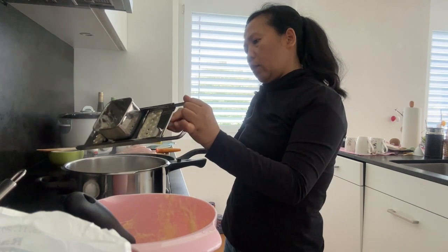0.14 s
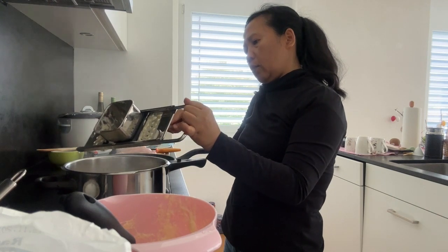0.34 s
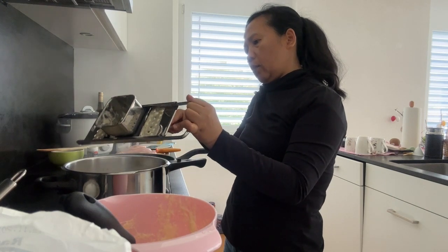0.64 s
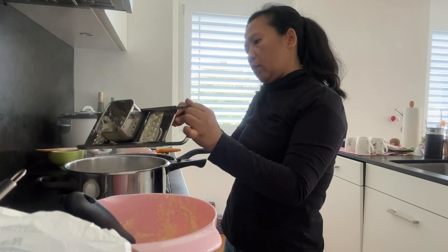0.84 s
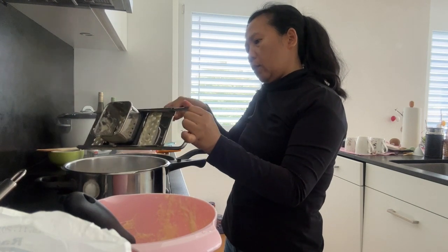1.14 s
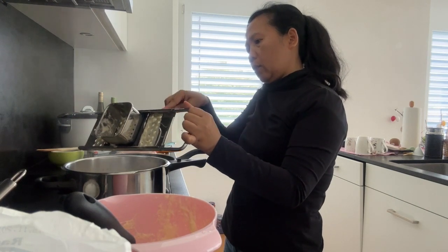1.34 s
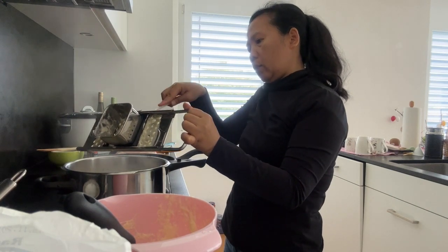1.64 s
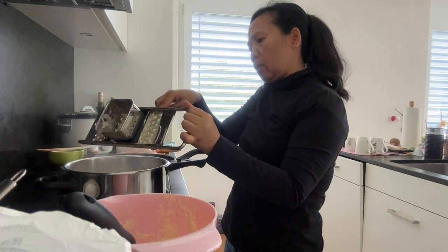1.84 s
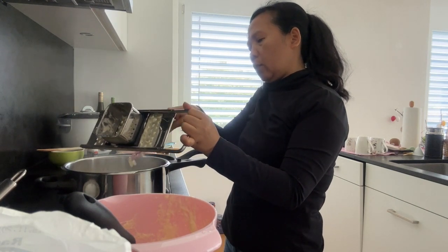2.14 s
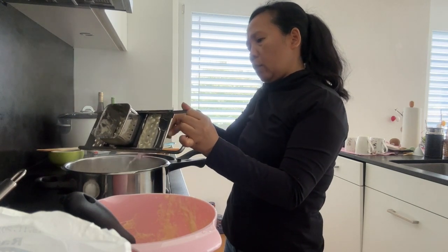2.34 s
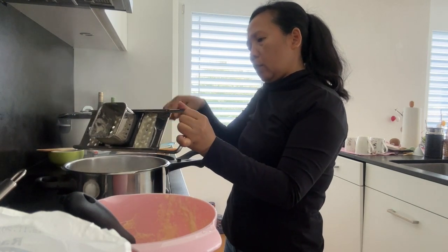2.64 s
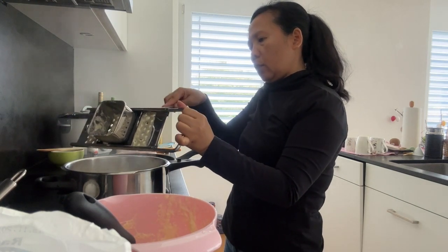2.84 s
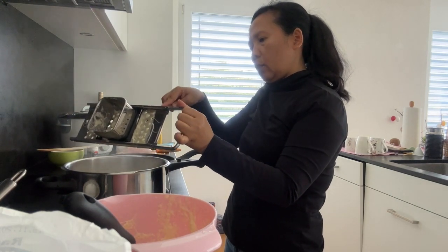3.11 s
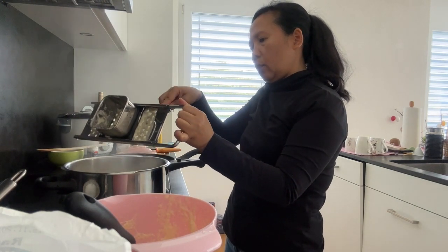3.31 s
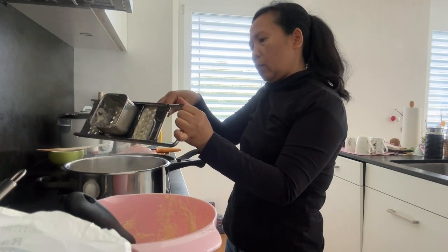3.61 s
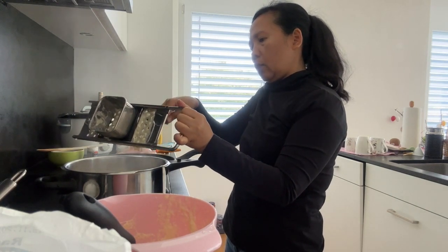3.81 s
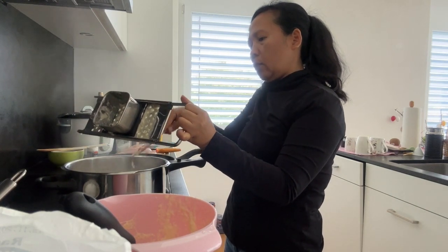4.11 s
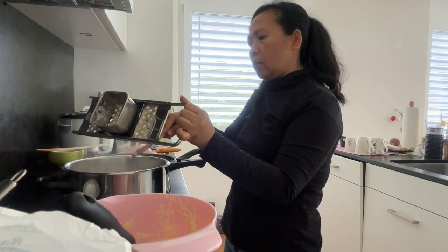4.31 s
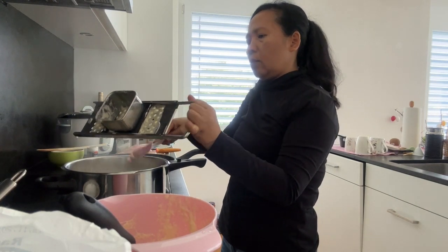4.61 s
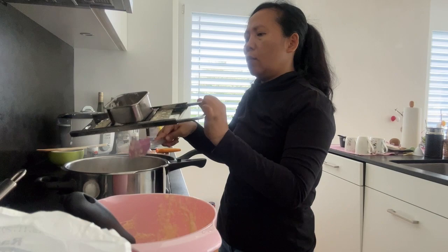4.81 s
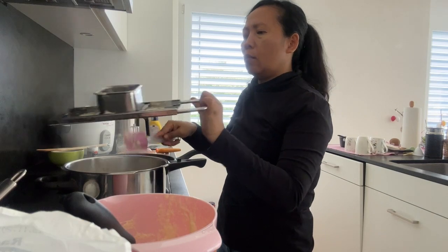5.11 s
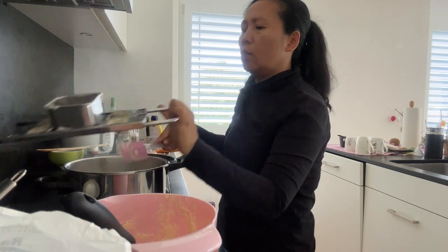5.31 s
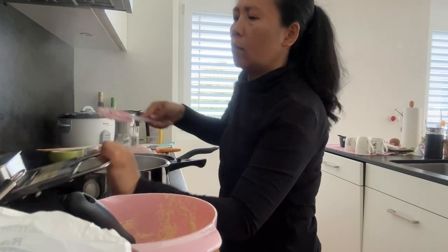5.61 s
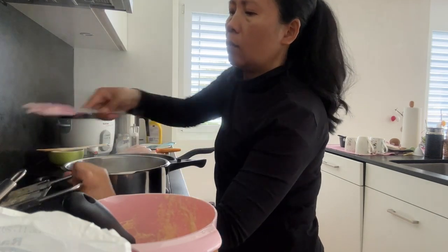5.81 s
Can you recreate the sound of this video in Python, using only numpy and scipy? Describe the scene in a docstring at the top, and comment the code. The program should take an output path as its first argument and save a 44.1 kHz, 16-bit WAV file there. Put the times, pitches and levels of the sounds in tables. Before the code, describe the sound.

Continuous extractor fan noise dominates: deep throbbing hum, faint wavering motor tones and hollow, duct-coloured air, slightly left in places. Above it a fine high simmering hiss flickers and spits occasionally. Nearly six seconds in, a loose metal kitchen tool lands close by with a tight burst of bright clanks and quickly damped ringing. The microphone's automatic gain pulls the background down under the clatter.

```python
"""Range hood, simmering pot and steel slicer

A twin-fan hood hums in a small kitchen: beating blade tones, magnetic hum and shaft tones are sines,
and the rush of air is noise coloured by duct resonances. The pot's hiss is flickering noise with spits.
At the end a steel slicer is put down on the counter: repeated blows excite decaying modes, dense noise
and short contact tones, with a room tail. A gain control then ducks everything under the clatter."""
import sys
import numpy as np
from scipy import signal
from scipy.fft import rfft, irfft
from scipy.io import wavfile
from scipy.ndimage import uniform_filter1d

SR = 44100
rng = np.random.default_rng(int(sys.argv[2]) if len(sys.argv) > 2 else 0)


def dump(signal):
    """Clip the signal to [-1, 1] and save it as 16-bit WAV at the path in sys.argv[1]."""
    limited = np.clip(np.atleast_2d(signal).T, -1, 1)
    pcm = np.round(limited * 32767).astype(np.int16)
    wavfile.write(sys.argv[1], SR, pcm)


N = 262395

# Weaker tones at multiples of the shaft speed: multiple, mean level/dB, wavering/dB
SHAFT_TONES = [(3.906, -54, -1), (4.98, -50.5, -0.5), (23.9, -56, -2.5)]
# Relative spectrum of the rush of air: f/Hz, level/dB per Hz
AIR_SPECTRUM = [(20, -45), (45, -13), (65, -13.5), (80, -1.5), (115, 2), (160, -1.5), (205, -7.5),
                (275, -20), (330, -13), (440, -15), (630, -13.5), (970, -12), (1200, -15.5), (1650, -18.5),
                (3500, -25), (7000, -29.5), (10000, -83)]
# Resonances of hood and duct: f/Hz, width/Hz, level/dB
DUCT_RESONANCES = [(178, 40, 1.5), (226, 13, -2.5), (300, 26.6, 4), (354, 61, 5), (538, 9.3, 5),
                   (793.8, 64, 8), (1082.7, 29, 6.5), (1346, 68, 4), (3220, 1000, 3), (4764, 400, 2.5)]
# Left-right likeness of the air noise: f/Hz, likeness (0-1)
AIR_LIKENESS = [(40, 0.955), (200, 0.947), (270, 0.15), (350, 0.32), (500, 0.47), (700, 0.68), (900, 0.995),
                (1000, 0.6), (1300, 0.31), (1600, 0.546), (1900, 0.037), (7000, 0.095)]
# Left-right level difference of the hood: f/Hz, left minus right/dB
AIR_BALANCE = [(30, -1.5), (45, 0.5), (70, 2.5), (90, 3.5), (200, 0.5), (350, -2.5), (800, 5.5),
               (1100, 3.5), (1350, 0), (1700, -0.5), (2000, -0.1), (7000, -2)]
# Relative spectrum of the pot's hiss: f/Hz, level/dB per Hz
HISS_SPECTRUM = [(2000, -12), (4000, -9), (6000, -3.5), (7800, -3.5), (9400, 1), (10500, -2.5), (13000, -3),
                 (14300, -2.5), (15800, -7.5)]
# Left-right likeness of the hiss: f/Hz, likeness (0-1)
HISS_LIKENESS = [(3000, 0.4), (6000, 0.17), (8000, 0.866), (9500, 0.9), (11500, 1), (14000, 1), (15000, 1),
                 (15800, 0.23)]
# Slow swell of the hiss: t/s, relative level/dB
HISS_SWELLS = [(0, 0.16), (.9, 1.4), (2.1, .5), (3.1, -0.71), (3.95, -0.5), (4.9, 0.2), (5.72, 0.13)]
# Drops that spit from the pot: t/s, initial level over the hiss/dB
SPIT_EVENTS = [(0.8674, 6), (1.7296, 4), (2.8864, -2), (3.7025, 6.5), (4.8194, 2.5), (5.1228, 8.5),
               (5.2994, 3)]
# Blows, first the frame landing, then the hopper rattling:
# t/s, strength/dB, share on the hopper (0-1), brightness/dB per octave, knock level/dB, knock f/Hz
BLOW_EVENTS = [(5.7459, -4.5, 0, 2.5, -21, 1000), (5.762, -14, 0.6, -6.5, -17, 640),
               (5.7785, -15, .45, -8, -7, 1180), (5.7836, -4, 0.8, -2, 6, 1250),
               (5.7866, -7, 0.85, 0, -14, 630), (5.800, -2.5, 0.84, 2.5, -3, 3720),
               (5.8114, -6, 0.8, 3, -4.5, 614), (5.8167, -10, 0.5, -3.5, -6, 1100),
               (5.835, -6.5, 0.86, 3.5, -11.5, 3450), (5.850, -17, 0.65, 0, -12, 1280),
               (5.858, -15, 0.77, -5.5, -20, 656), (5.896, -19, 0.8, -1, -26, 3000),
               (5.925, -28.5, 0.58, 2.5, -28, 873)]
# Relative spectrum of steel overtones too close to tell apart: f/Hz, level/dB per Hz
CLANK_SPECTRUM = [(150, -18), (250, -3), (450, 2), (634, 6), (784, 2.5), (1230, 8), (1900, 0), (2670, -0.5),
                  (3600, 0), (4660, -13), (5600, -5), (6300, -20), (7800, -36), (13200, -60)]
# Decay of these overtones: f/Hz, time to fall 60 dB/s
CLANK_DECAY = [(300, 0.19), (1000, 0.21), (4000, 0.11), (12000, 0.06)]
# Left-right level difference of the steel: f/Hz, left minus right/dB
STEEL_BALANCE = [(100, 5), (400, -3), (620, 7), (1026, -5.5), (1250, -1), (1785, 9.5), (2300, 0), (3000, 4),
                 (3725, 1), (5600, 1), (7100, -2.5), (8900, -0.5)]
# Left-right phase difference of the steel: f/Hz, lead of the left port/rad
STEEL_PHASE = [(100, 0.31), (400, 0.76), (620, 1.4), (1026, 1.7), (1250, 0.98), (1785, 2.3), (2300, 2.58),
               (3015, 4.335), (3725, 3.9), (4060, 5.5), (5600, 4.6), (7100, 4.3), (8860, 5.9), (10100, 6.7),
               (13600, 9.1), (15500, 9.7)]
# Decay of the room: f/Hz, time to fall 60 dB/s
ROOM_DECAY = [(150, .08), (500, .35), (1000, .45), (4000, .4), (12000, .2)]
# Modes of the slicer: f/Hz, relative level/dB, time to fall 60 dB/s, share of the loose hopper (0-1)
STEEL_MODES = [(394, -18.5, 0.27, 0.3), (606, -8, 0.16, 0.44), (655, -9, 0.27, 0.65), (897, -13, 0.52, 0.6),
               (1026, -6, 0.34, 0.54), (1091, -10, 0.25, 0.6), (1160, -12, 0.2, 0.4), (1205, -8, 0.3, 0.6),
               (1269, -7, 0.33, 0.37), (1502, -7.5, 0.25, 0.5), (1774, -4.5, 0.085, 0.82),
               (1880, -4, 0.067, 0.7), (1955, -8, .15, 0.6), (2140, -16, .2, .7), (2298, 4.5, 0.11, 0.78),
               (2378, -10, .15, 1), (2994, -13.5, 0.32, 1), (3013, -10.5, 0.35, 0.9), (3439, -14, 0.3, 1),
               (3474, -12, .3, 0.95), (3560, -16, .12, 1), (3661, 0, 0.18, 1), (3734, -6, 0.26, 0.89),
               (4028, -16, 0.18, 0.95), (4026, -12.5, 0.22, 0.78), (4930, -25, 0.4, 0.34),
               (5560, -20.5, 0.25, 0.97), (5614, -18.5, 0.21, 0.83), (7070, -12.5, 0.12, 0.06),
               (8864, -23.5, 0.34, 0.6), (9060, -30, .3, .6), (10086, -28.5, 0.2, 0.54),
               (12700, -24, .12, 0), (13601, -39, 0.11, 0.9)]

# Hood: one blade tone per fan wheel, six pulses a turn; levels are rms before the port difference
BLADE_HZ, IN_STEP_S = (85.87, 86.25), 0.35
BLADE_DB, OCTAVE_DB = -42.5, -50.5  # for each wheel
HUM_HZ, HUM_DB = 99.97, -38.0  # magnetic hum at twice the mains frequency
AIR_DB, AIR_LAG_S = -35.5, 0.0002  # the hood is on the left, so the right port lags

# Pot hiss: the right port is a delayed, partly alike copy, which makes it sound wide
HISS_DB, HISS_LAG_S = -42, 1.05e-4
SPIT_MS = 6.9  # power falls to 1/e in this time

# Slicer
CRACK_S, CRACK_DB, CRACK_MS, CRACK_HZ = 5.7455, -20, 8, 7000  # first contact of steel on stone
THUD_S, THUD_HZ, THUD_DB, THUD_LENGTH_S = 5.7468, 175, -6, 0.02
SNAP_DB, SNAP_MS, SNAP_HZ = -11, 1.6, 2600  # tick of hopper contacts, relative to the blow
RING_DB = -4
CLANK_DB, CLANK_GROWTH = -6, 0.41  # the clank grows by 0.41 dB per dB of blow strength
CLANK_GRAIN_DB = 2.5  # rms roughness as the loose parts chatter
FRAME_DULL_DB = -2.5  # frame clank, about this much per octave above 1 kHz
KNOCK_CYCLES = 28  # a contact tone falls 60 dB in this many cycles
COUNTER_HZ, COUNTER_DB, COUNTER_T60_S = 150.7, -8, 0.16
CONTACT_DB = -1.8  # each new contact damps what already rings
SETTLE_S, SETTLE_LENGTH_S, SETTLE_DB = 5.868, 0.008, -11  # full damping from 4 kHz up

RUMBLE_CUT_HZ, EDGE_HZ = 33, 15760


def gain_of(db):
    """Logarithmic level: 20 dB is a factor of ten in amplitude."""
    return 10 ** (np.asarray(db) / 20)


def evened(x):
    """Normalization to unit root mean square."""
    return x / np.sqrt(np.mean(x ** 2) + 1e-20)


def read(points, hz):
    """Linear interpolation on a logarithmic frequency axis."""
    f, value = np.transpose(points)
    return np.interp(np.log(hz + 1), np.log(f + 1), value)


def drift(t, slow_hz, fast_hz):
    """Random fluctuation as a superposition of slow sines with random phases."""
    total = 0
    for f in np.geomspace(slow_hz, fast_hz, 24):
        total = total + np.sin(2 * np.pi * (f * t + rng.random())) / np.sqrt(f)
    return evened(total)


def patches(hz, t, bins, steps):
    """Random field correlated over neighbouring frequencies and times by moving averages."""
    field = rng.standard_normal((len(t), len(hz))).T
    across_hz = uniform_filter1d(field, bins, axis=0)
    return evened(uniform_filter1d(across_hz, steps, axis=1))


def stereo_noise(size, field_db, likeness, lead, balance_db):
    """Partial coherence: two ports share part of a random short-time spectrum shaped by field_db(hz, t)."""
    frames, hz = 4 * N // size + 5, np.fft.rfftfreq(size, 1 / SR)
    a, b, c, d = rng.standard_normal((frames, len(hz), 4)).T
    same = np.clip(likeness(hz), 0, 1)[:, None]
    left = a + 1j * b
    right = same * left + np.sqrt(1 - same ** 2) * (c + 1j * d)
    right = right * np.exp(-1j * lead(hz))[:, None]
    half = gain_of(balance_db(hz) / 2)[:, None]
    spectra = np.array([left * half, right / half])
    spectra *= gain_of(field_db(hz, np.arange(frames) * size / 4 / SR))
    waves = signal.istft(spectra, nperseg=size, noverlap=3 * size // 4)[1]
    return evened(waves[:, :N])


def ports(x, balance, lead):
    """Stereo differences: one source reaches two ports with unlike level and phase (rad)."""
    padded = N + 4096  # keeps shifted sound from wrapping round
    hz = np.fft.rfftfreq(padded, 1 / SR)
    half = gain_of(read(balance, hz) / 2) * np.exp(0.5j * lead(hz))
    return irfft(rfft(x, padded) * np.array([half, 1 / half]), padded)[:, :N]


def air_lead(hz):
    """A constant delay gives a phase lead proportional to frequency."""
    return 2 * np.pi * hz * AIR_LAG_S


def fan_tones():
    """Beating: nearly equal blade tones and their octaves interfere, beside hum and wavering shaft tones."""
    t = np.arange(N) / SR
    tones = gain_of(HUM_DB) * np.cos(2 * np.pi * HUM_HZ * t)
    for hz in BLADE_HZ:
        phase = 2 * np.pi * hz * (t - IN_STEP_S)
        tones += gain_of(BLADE_DB) * np.cos(phase)
        tones += gain_of(OCTAVE_DB) * np.cos(2 * phase)
    shaft_hz = BLADE_HZ[1] / 6
    for multiple, db, waver_db in SHAFT_TONES:
        waver = np.interp(t, t[::400], drift(t[::400], 0.35, 2.52))
        sine = np.sin(2 * np.pi * (multiple * shaft_hz * t + rng.random()))
        tones += gain_of(db + waver_db * waver) * sine
    return ports(np.sqrt(2) * tones, AIR_BALANCE, air_lead)  # root two turns rms into peak


def air():
    """Turbulence filtered by resonance: broadband noise is coloured by the peaks and dip of the duct."""
    def field_db(hz, t):
        duct_db = sum(db / (1 + (2 * (hz - f) / width) ** 2) for f, width, db in DUCT_RESONANCES)
        steady_db = (read(AIR_SPECTRUM, hz) + duct_db)[:, None]
        return steady_db + 0.95 * patches(hz, t, bins=24, steps=10) + 0.5 * drift(t, 0.2, 10.0)

    rush = stereo_noise(2048, field_db, lambda hz: read(AIR_LIKENESS, hz),
                        air_lead, lambda hz: read(AIR_BALANCE, hz))
    return gain_of(AIR_DB) * rush


def pot():
    """Random bursting: bubbles make noise flicker over wide bands, and spitting drops add decaying power."""
    def field_db(hz, t):
        swell_t, swell_db = np.transpose(HISS_SWELLS)
        level_db = read(HISS_SPECTRUM, hz)[:, None] + np.interp(t, swell_t, swell_db)
        spit_power = 0
        for at, over_db in SPIT_EVENTS:
            decay = np.exp(-np.maximum(t - at, 0) * 1000 / SPIT_MS)
            spit_power = spit_power + gain_of(over_db) ** 2 * decay * (t > at - 0.0015)
        flicker = np.minimum(rng.exponential(1, len(t)), 5) - 1
        level_db = level_db + 10 * np.log10(1 + spit_power) + 1.35 * uniform_filter1d(flicker, size=3)
        return level_db + 0.705 * patches(hz, t, bins=10, steps=40) + 0.5 * drift(t, 2.5, 30.0)

    hiss = stereo_noise(256, field_db, lambda hz: read(HISS_LIKENESS, hz),
                        lambda hz: 2 * np.pi * hz * HISS_LAG_S, lambda hz: 0 * hz)
    return gain_of(HISS_DB) * hiss


def tick(t, db, decay_ms, corner_hz):
    """Impulsive contact: exponentially decaying noise, band-shaped around corner_hz; db drives the filter."""
    pole = np.exp(-2 * np.pi * corner_hz / SR)
    burst = signal.lfilter([1, -1], np.poly([pole, pole]), rng.standard_normal(len(t)))
    return gain_of(db) * burst * np.exp(-t * 1000 / decay_ms)


def thud(t):
    """Forced response: the counter top gives one short swell under a half-sine envelope."""
    swell = np.sin(np.pi * np.minimum(t / THUD_LENGTH_S, 1))
    return gain_of(THUD_DB) * swell * np.sin(2 * np.pi * THUD_HZ * t)


def ring(s, on_hopper, tilt_db, t):
    """Modal superposition: a blow at s feeds dying sines by place and brightness; later contacts damp them."""
    hz, db, t60, hopper = np.transpose(STEEL_MODES)[:, :, None]
    fed = (1 - hopper) * (1 - on_hopper) + hopper * on_hopper
    spot_db = 1.5 * rng.standard_normal(hz.shape)  # each blow lands on another spot
    slip = 0.8 * rng.standard_normal(hz.shape)  # rad out of step with earlier ringing
    level_db = db + spot_db + tilt_db * np.log2(hz / 2000) - 60 * t / t60
    if s < SETTLE_S:  # coming to rest damps the high ring
        settled = np.clip((t + s - SETTLE_S) / SETTLE_LENGTH_S, 0, 1)
        level_db += np.minimum(hz / 4000, 1) * SETTLE_DB * settled
    for later in BLOW_EVENTS:
        if later[0] > s + 0.006:
            level_db += CONTACT_DB * np.clip((t + s - later[0]) / 0.002, 0, 1)
    # Phase follows scene time, so later blows add nearly in step
    return (fed * gain_of(level_db) * np.sin(2 * np.pi * hz * (t + s) + slip)).sum(0)


def clank(t, on_hopper):
    """High modal density: overlapping overtones act as noise whose bands decay at their own rates."""
    hz, frames, z = signal.stft(rng.standard_normal(len(t)), SR, nperseg=128)
    dull_db = FRAME_DULL_DB * (1 - on_hopper) * np.log2(1 + hz / 1000)
    start_db = (read(CLANK_SPECTRUM, hz) + dull_db)[:, None]
    fall_db = 60 * frames / read(CLANK_DECAY, hz)[:, None]
    wave = signal.istft(z * gain_of(start_db - fall_db), SR, nperseg=128)[1]
    grain = evened(uniform_filter1d(rng.standard_normal(len(t)), size=60))
    return wave[:len(t)] * gain_of(CLANK_GRAIN_DB * grain)


def slicer():
    """Impact excitation: a crack and thud, then blows that knock, ring and clank; hopper blows also tick."""
    t, out = np.arange(SR // 4) / SR, np.zeros(N + SR)

    def add(s, sound):
        out[round(s * SR):][:len(t)] += sound

    add(CRACK_S, tick(t, CRACK_DB, CRACK_MS, CRACK_HZ))
    add(THUD_S, thud(t))
    counter = gain_of(COUNTER_DB - 60 * t / COUNTER_T60_S) * np.sin(2 * np.pi * COUNTER_HZ * t)
    build_up = 1 - np.exp(-t / 0.0005)  # the contact builds up
    for s, db, on_hopper, tilt_db, knock_db, knock_hz in BLOW_EVENTS:
        knock_level_db = knock_db - 60 * t * knock_hz / KNOCK_CYCLES
        blow = gain_of(knock_level_db) * np.sin(2 * np.pi * knock_hz * t)
        blow += gain_of(RING_DB + db) * ring(round(s * SR) / SR, on_hopper, tilt_db, t)
        blow += gain_of(CLANK_DB + CLANK_GROWTH * db) * clank(t, on_hopper)
        snap = tick(t, db + SNAP_DB, SNAP_MS, SNAP_HZ)
        blow += on_hopper * (gain_of(db) * counter + snap)
        add(s, blow * build_up)
    return out[:N]


def kitchen(x):
    """Reverberation: the last second is convolved with sparse random-sign taps, decaying band by band."""
    taps = np.zeros((2, SR // 2))
    at = np.arange(100, SR // 2 - 20, 20)
    at = at + rng.integers(0, 20, (2, len(at)))
    np.put_along_axis(taps, at, rng.choice([-1.0, 1.0], at.shape), 1)
    hz, t, z = signal.stft(taps, SR, nperseg=256)
    tail = signal.istft(z * gain_of(-60 * t / read(ROOM_DECAY, hz)[:, None]), SR, nperseg=256)[1]
    tail = tail / np.linalg.norm(tail[0])
    return signal.fftconvolve(x[None, -SR:], tail, axes=1)[:, :SR]


def scene():
    """Linear superposition of hood, pot, slicer and the room's answer to the slicer."""
    out = fan_tones() + air() + pot()
    steel = slicer()
    out += ports(steel, STEEL_BALANCE, lambda hz: read(STEEL_PHASE, hz))
    out[:, -SR:] += gain_of(-8.0) * kitchen(steel)
    return out


def record(dry):
    """Dynamic compression: a peak-holding level detector ducks the whole sound between two band limits."""
    rumble_cut = signal.butter(4, RUMBLE_CUT_HZ, "high", fs=SR, output="sos")
    dry = signal.sosfilt(rumble_cut, dry)
    power = uniform_filter1d((dry ** 2).mean(0), 300)
    power_db = 10 * np.log10(abs(power) + 1e-12)
    fall_db = np.arange(N) * 9.9 / SR  # the detector recovers 9.9 dB a second
    held_db = np.maximum.accumulate(power_db + fall_db) - fall_db
    over_db = np.maximum(held_db + 21.5, 0)  # excess over a threshold of -21.5 dB
    ducked = dry / gain_of(0.46 * uniform_filter1d(over_db, 200))
    low_pass = signal.firwin(1023, EDGE_HZ, window=("kaiser", 10), fs=SR)
    return signal.oaconvolve(ducked, low_pass[None], "same")


dry = scene()
out = record(dry)
dump(out)
```